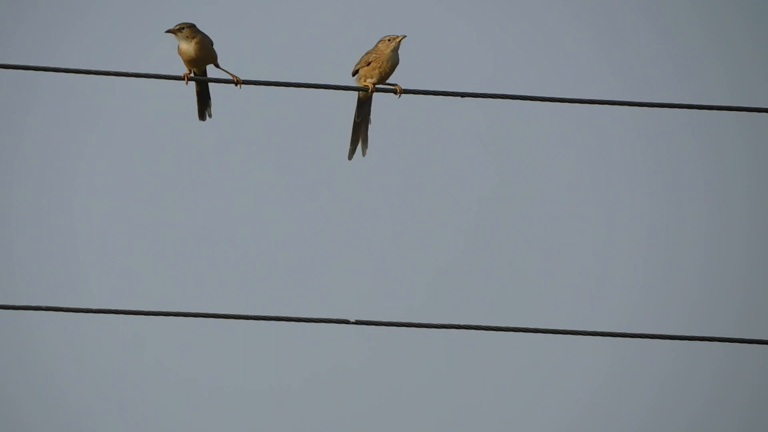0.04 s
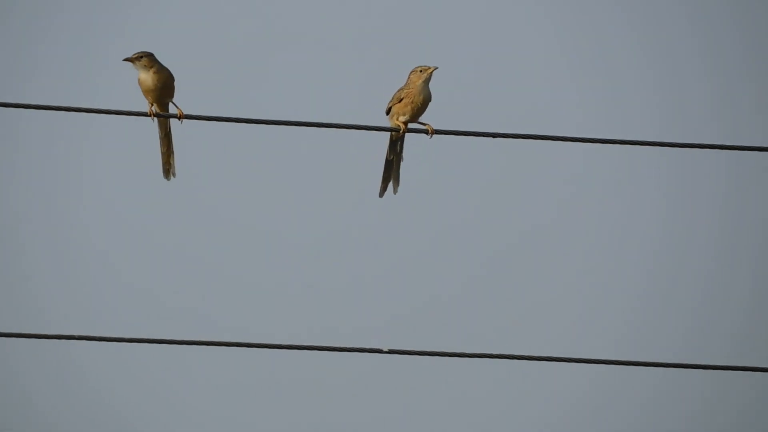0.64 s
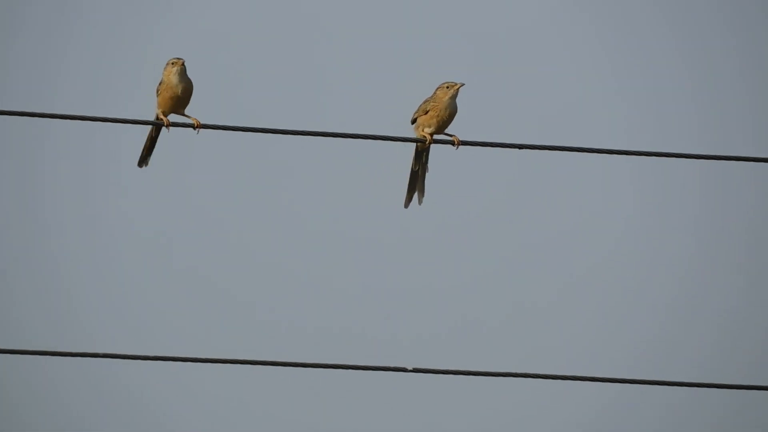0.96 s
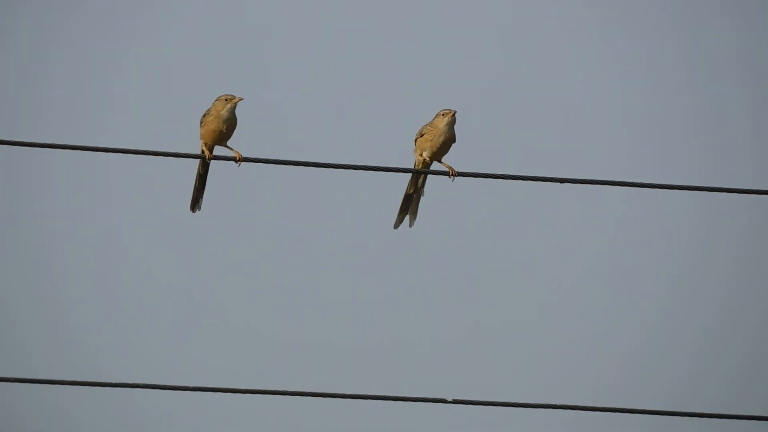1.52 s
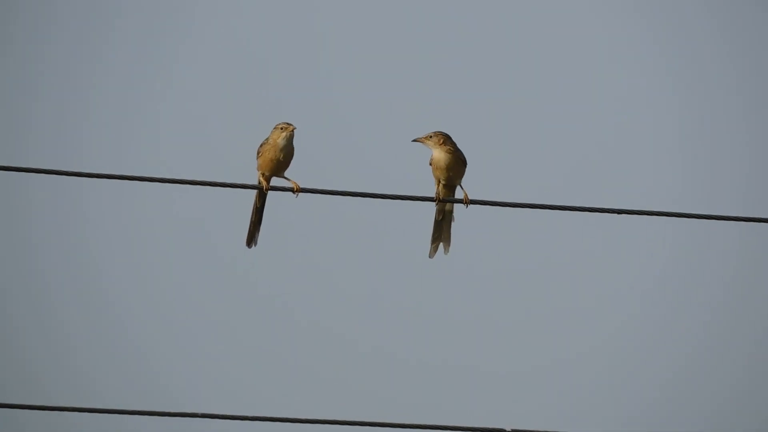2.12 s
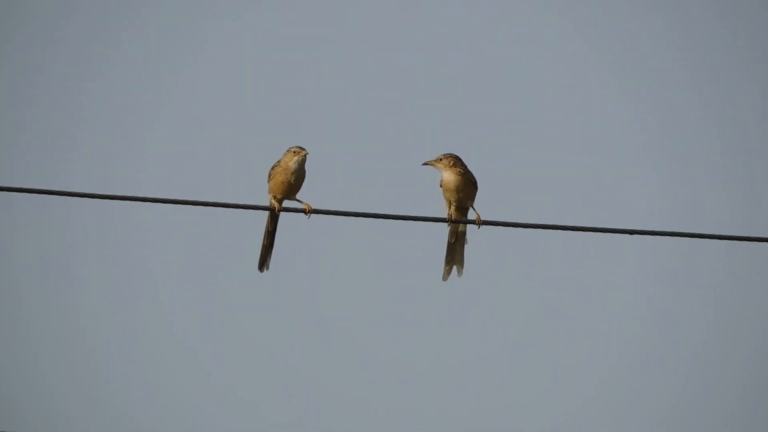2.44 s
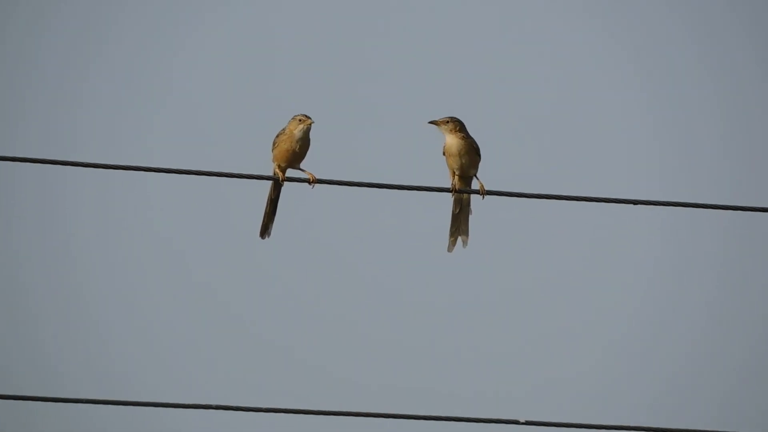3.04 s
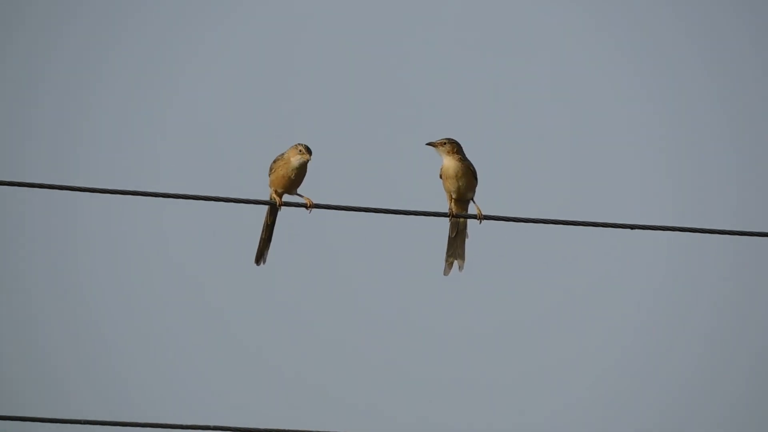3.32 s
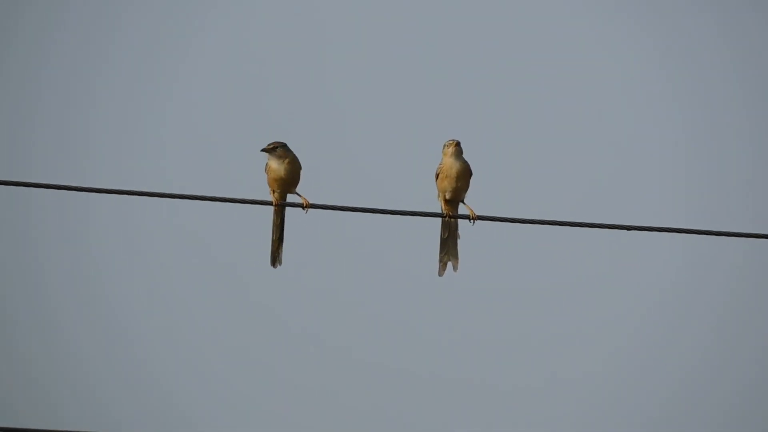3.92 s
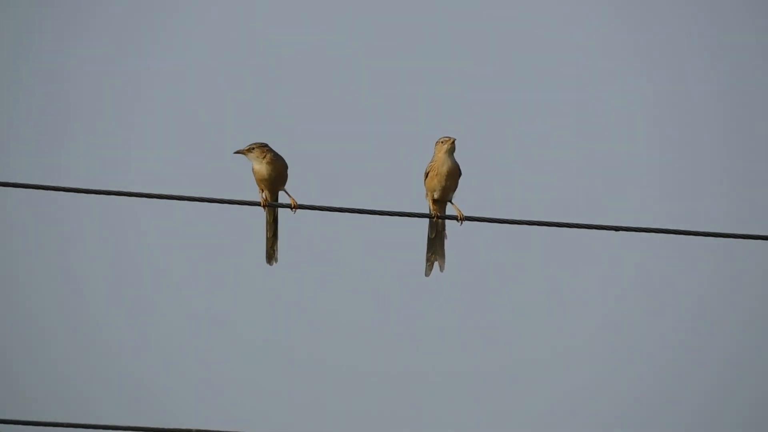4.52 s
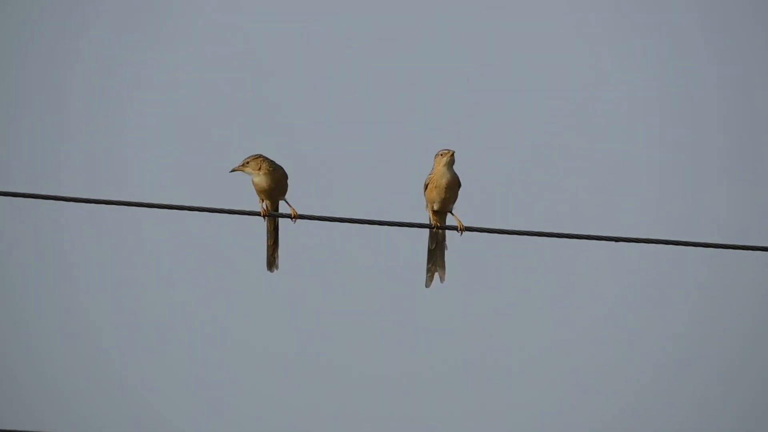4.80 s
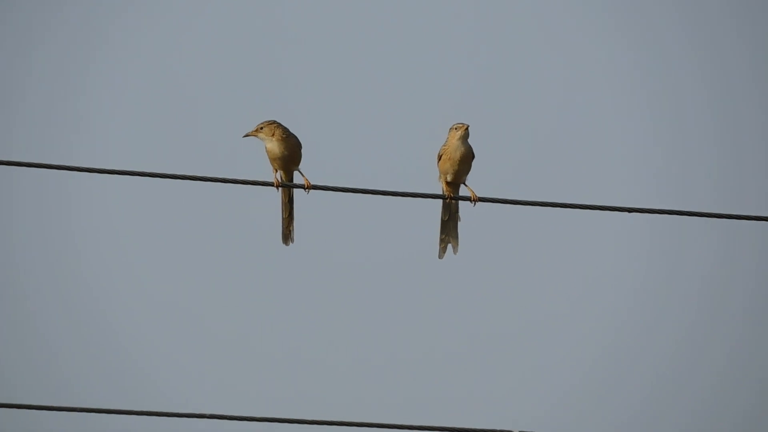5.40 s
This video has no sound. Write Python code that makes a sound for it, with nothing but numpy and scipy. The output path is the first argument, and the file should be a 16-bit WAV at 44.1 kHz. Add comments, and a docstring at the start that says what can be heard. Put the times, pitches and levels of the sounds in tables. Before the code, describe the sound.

Gusty wind buffets the microphone outdoors, mostly on the left, with a low rumble and irregular thumps. It dies down after about four seconds. Behind it, distant traffic murmurs with a faint gear whine and a thin squeal at the start. A small bird gives a few short, sharp chips, while other birds whistle and twitter faintly further off.

```python
"""Gusty wind buffets a camera's two microphone ports in open country, mostly the left one, and dies down.
Eddies thump on the ports, and the air fizzes faintly in the hardest gusts. Behind the wind, far
traffic murmurs and its gears whine, with a thin squeal at first. One small bird gives sharp chips
while others whistle and twitter further off."""
import sys
import numpy as np
from scipy import signal
from scipy.fft import rfft, irfft, next_fast_len
from scipy.io import wavfile
from scipy.ndimage import uniform_filter1d, map_coordinates

SR = 44100
rng = np.random.default_rng(int(sys.argv[2]) if len(sys.argv) > 2 else 0)


def to_wav(sig):
    """Store sig (one row per channel, or 1-D mono) as 16-bit WAV at the path in sys.argv[1].

    Samples outside -1..1 are clipped; the rate is SR.
    """
    pcm = np.clip(np.atleast_2d(sig), -1, 1) * 32767
    pcm = np.round(pcm).astype(np.int16)
    wavfile.write(sys.argv[1], SR, pcm.T)  # frames by channels


N = 244755
T = np.arange(N) / SR

# the hardest single eddies: t/s, relative level/dB, left minus right/dB, swing f/Hz, whirl offset/dB
VORTICES = [(0.314, -6.5, 23, 127.4, -35), (0.408, -4.5, 31, 145.3, -22), (0.465, -5, 28, 174, -14.5),
            (0.81, -11, 23, 212, -7), (0.838, 0, 33, 173, -7), (0.875, -8.5, 8, 172, -22),
            (0.926, -7.5, 27, 240, -18), (0.961, -9.5, 22, 145, -5.5), (1.123, -11, 16, 113.9, -11),
            (1.484, -16.5, 24, 290, -27), (1.99, -8, 19, 149, -5), (2.048, -10, 22, 310, -7),
            (2.081, -0.5, 30, 184, -8), (2.124, -3, 31, 216, -13.5), (2.169, -6, 11, 121, -18),
            (2.209, -6.5, 21, 178.8, -8), (2.287, -3, 20, 126, -24), (2.367, -12, 15, 322.2, -8),
            (2.475, -10.5, 18, 288, -4), (2.493, -3.5, -26, 219, -6), (2.548, -14, -25, 270.6, -4.5),
            (2.634, -11, -14, 186, -7), (2.671, -5.5, 12, 168, -18.5), (3.169, -1.5, 27, 199, -20.5),
            (3.434, -4, 27, 140.7, -10), (3.462, -7, 15, 298.7, 0.5), (3.529, -1.5, 32, 189.8, -18),
            (3.605, -1.5, 32, 187, -16.5), (3.759, -6, 30, 242.5, -4.5), (3.837, -13, 29, 191.4, -5),
            (3.939, -6.5, 29, 180.2, -11.5)]


def undb(db):
    """Decibels to gain."""
    return 10 ** (np.asarray(db) / 20)


def curves(table):
    """Each column after t/s, joined by straight lines."""
    s, *columns = np.transpose(table)
    return [np.interp(T, s, c) for c in columns]


def noise(colour, size=N):
    """Noise of rms 1, coloured by points of f/Hz, level/dB."""
    hz, db = np.transpose(colour)
    n = next_fast_len(size)
    f = np.maximum(np.arange(n // 2 + 1) * SR / n, 1)
    gain = undb(np.interp(np.log(f), np.log(hz), db))
    x = irfft(rfft(rng.standard_normal(n)) * gain, n)[:size]
    return x / x.std()


def smooth(x, samples):
    """Two moving averages in a row."""
    return uniform_filter1d(uniform_filter1d(x, samples), samples)


def walk(rate):
    """Smooth random modulation with a spread of 1 and `rate` new values a second."""
    hold = int(SR / rate)
    x = smooth(np.repeat(rng.standard_normal(N // hold + 1), hold), hold)[:N]
    return x / x.std()


def tone(hz):
    """A sine that follows a pitch curve."""
    return np.sin(2 * np.pi * (np.cumsum(hz) / SR + rng.random()))


def add(out, s, x):
    """Mix a short sound in at time s."""
    i = max(int(s * SR), 0)
    out[i:i + len(x)] += x[:N - i]


def pan(x, left_db):
    """Feed both ports, with the left one left_db above the right."""
    return x * undb(np.array([[left_db], [-left_db]]) / 2)


def shares(left_db):
    """How power divides between the left and the right port."""
    return (1 / (1 + undb([-left_db, left_db]) ** 2))[:, None]


def outdoors(x, wet_db, t60):
    """Ground, trees and walls scatter a short tail, different at each port."""
    t = np.arange(SR // 2) / SR
    tails = rng.standard_normal((2, len(t))) * undb(-60 * t / t60) * (t > .012)
    tails /= np.sqrt(np.sum(tails ** 2, axis=1, keepdims=True))
    return x + undb(wet_db) * signal.fftconvolve(x, tails, axes=1)[:, :N]


def twitter(level_db=-73, low_hz=2400, high_hz=4600, length_s=0.0375, count=40):
    """Many birds, far off, blur into a faint twitter."""
    out = np.zeros(N)
    for when, pitch, slope, size in rng.random((count, 4)):
        u = np.linspace(-1, 1, int(length_s * (.5 + size) * SR))
        hz = (low_hz + pitch * (high_hz - low_hz)) * (1 + .15 * (slope - .6) * u)
        add(out, when * T[-1], tone(hz) * (1 - u ** 2) * undb(level_db))
    return outdoors(pan(out, left_db=-4), wet_db=1, t60=0.47)


def road(floor_db=-50.5, nearer_db=6, recede_s=1.93, side_db=-11):
    """Far tyres and engines: a dull, narrow murmur that recedes to a steady bed."""
    # road noise from afar: f/Hz, level/dB
    colour = [(25, -23), (70, -8), (130, 0), (220, 7.5), (320, 11), (450, 4), (660, 4.5), (900, 1.5),
              (1300, -3.5), (1550, -9), (1900, -14), (2400, -13.5), (3500, -19), (8000, -31)]
    db = floor_db + nearer_db * np.exp(-T / recede_s) + 0.37 * walk(10)
    mid, side = noise(colour), noise(colour)
    murmur = mid + undb(side_db) * side * np.array([[1], [-1]])
    return pan(undb(db) * murmur, left_db=4)


def gear_whine(teeth=35, trim_db=-2.5, flutter_db=2, wander=0.00092, jitter=.002):
    """Far gear teeth sing, with sidebands spaced by the shaft rate; moving air makes each line flutter."""
    # tooth rate: t/s, f/Hz
    pitch = [(0, 1194), (.6, 1197), (1, 1208), (2.1, 1209), (3.15, 1195), (4.05, 1136), (4.4, 1116),
             (4.9, 1115), (5.55, 1152)]
    # the wind carries the whine in and out: t/s, relative level/dB
    fader = [(0.05, -53.5), (1.25, -53), (2.3, -58.5), (2.6, -65), (3.3, -60), (4.05, -59), (4.45, -64),
             (5.05, -62.5), (5.35, -53), (5.55, -54)]
    # lines of the whine: multiple of the shaft rate
    orders = [9.25, 18.5, 33, 34, 35, 37, 38, 39, 40, 49.3, 70]
    # balance of those lines: start level/dB, middle level/dB, end level/dB
    balance = [(8.5, 0.5, -19), (1.5, 0, -4.5), (-0.5, -2.5, -13), (-1, -11, -2.5), (0, 3, 3.5),
               (-0.5, -14, -3), (-11, 1, -14), (-0.5, -12, -5), (-4, -11, -21), (-38, -12, -6),
               (-23, -17, -12)]
    (tooth_hz,), (db,) = curves(pitch), curves(fader)
    shaft_hz = tooth_hz / teeth
    out = 0
    for order, levels in zip(orders, balance):
        line_db = np.interp(T, np.linspace(0, T[-1], len(levels)), levels)
        unsteady = 1 + wander * walk(30.07) + jitter * walk(150)
        out += tone(order * shaft_hz * unsteady) * undb(line_db + flutter_db * walk(16))
    return pan(out * undb(db + trim_db), left_db=3)


def squeals(flutter_db=2, wander=0.00394, rasp=.005, trim_db=-1):
    """Two thin, rough lines in the far traffic beat against each other as they sink and fade."""
    # one track for each squeal: t/s, f/Hz, relative level/dB
    tracks = [
        [(0.04, 1717, -50), (0.12, 1705, -45.5), (0.25, 1729, -56), (0.45, 1680, -60), (0.55, 1644, -52.5),
         (0.7, 1590, -53), (0.82, 1585, -63)],
        [(0.12, 1628, -45.5), (0.21, 1650, -48), (0.36, 1665, -47), (0.47, 1669, -50), (0.55, 1657, -47.5),
         (0.8, 1640, -51), (0.93, 1611, -53.5), (1.08, 1547, -62)],
    ]
    out = 0
    for track in tracks:
        hz, db = curves(track)
        fade = np.clip((T - track[0][0]) / 0.032, 0, 1) * np.clip((track[-1][0] - T) / .01, 0, 1)
        unsteady = 1 + wander * walk(70) + rasp * walk(300)
        out += fade * tone(hz * unsteady) * undb(db + trim_db + flutter_db * walk(88.8))
    return pan(out, left_db=2.5)


def bird_whistles(waver=0.015, flutter_db=2.5, trim_db=0.5):
    """Short slurs, each bent through three pitches and made unsteady by the distance."""
    # notes of the further birds: t/s, length/s, start f/Hz, middle f/Hz, end f/Hz, relative level/dB
    slurs = [(0.814, 0.027, 3370, 3050, 2855, -59), (0.824, 0.063, 2130, 2090, 2050, -57),
             (0.875, 0.047, 1895, 1810, 1710, -55), (1.047, .042, 2160, 2094, 2050, -57),
             (1.084, 0.055, 1865, 1820, 1750, -57.5), (1.644, .027, 3380, 3620, 3400, -67),
             (1.683, 0.023, 3362, 3380, 3150, -70), (2.052, 0.07, 4010, 4450, 4402, -66),
             (2.223, 0.065, 4170, 3938, 3900, -64), (2.278, 0.032, 4124, 4060, 3530, -61.5),
             (4.109, 0.055, 3480, 3505, 3040, -61.5), (4.455, 0.0637, 3000, 2794, 2706, -57.5),
             (4.515, 0.044, 2814, 2597, 2642, -61), (4.646, 0.1, 3350, 3144, 3172, -63.5),
             (4.877, .064, 2710, 2647, 2535, -60), (5.081, 0.11, 4615, 4480, 4210, -73),
             (5.165, 0.068, 3044, 3035, 2990, -66)]
    out, drift = np.zeros(N), 1 + waver * walk(250)
    for s, length, start_hz, middle_hz, end_hz, db in slurs:
        u = np.linspace(-1, 1, int(length * SR))
        hz = middle_hz + u * (end_hz - start_hz) / 2 + u ** 2 * ((start_hz + end_hz) / 2 - middle_hz)
        hz *= drift[int(s * SR):][:len(u)]
        add(out, s, tone(hz) * np.sqrt(1 - u ** 2) * undb(db))
    out *= undb(trim_db + flutter_db * walk(180))
    return outdoors(pan(out, left_db=1), wet_db=-5.5, t60=0.25)


def bird_chips(first_db=-14, third_db=-21, echo_db=-12, echo_s=.013, beak_width_hz=750):
    """The pitch shoots up, holds and drops; the beak rings at the top of the second harmonic's arch."""
    # the nearest bird's second harmonic:
    # t/s, length/s, start f/Hz, top f/Hz, end f/Hz, level/dB, rasp/share of the pitch
    arches = [(0.507, 0.026, 3180, 4560, 2770, -48.5, 0.012),
              (1.418, 0.023, 3340, 4400, 2900, -47.5, 0.0063), (2.579, 0.028, 3604, 4564, 3544, -53, 0.061),
              (4.473, 0.024, 3675, 4550, 3540, -52.5, 0.029)]
    out, shake = np.zeros(N), walk(900)
    for s, length, start_hz, top_hz, end_hz, db, rasp in arches:
        u = np.linspace(-1, 1, int(length * SR))
        droop = np.abs(u) ** np.where(u < 0, 7, 2.6)
        hz = top_hz + (np.where(u < 0, start_hz, end_hz) - top_hz) * droop
        beak = 1 / np.hypot(1, (hz - top_hz) / beak_width_hz)
        hz *= 1 + rasp * shake[int(s * SR):][:len(u)]
        harmonics = tone(hz) + undb(first_db) * tone(hz / 2) + undb(third_db) * tone(hz * 3 / 2)
        note = harmonics * beak * np.sqrt(1 - u ** 2) * undb(db)
        add(out, s, note)
        add(out, s + echo_s, note * undb(echo_db))
    return outdoors(pan(out, left_db=3), wet_db=-5, t60=0.075)


def fizz(pressure, rush_db=-36, tick_db=-19, ticks_per_s=25, tick_s=.0003, smooth_s=0.013):
    """Hard gusts hiss over the ports and now and then tick."""
    # air rushing over a port: f/Hz, level/dB
    colour = [(500, 18), (2000, -2), (5000, -3.5), (9000, 1), (16000, 0)]
    force = np.sqrt(np.abs(smooth(pressure ** 2, int(smooth_s * SR))))
    rush = np.array([noise(colour) * undb(2 * walk(150)) for _ in range(2)])
    kicks = (rng.random((2, N)) < ticks_per_s / SR) * rng.uniform(0.45, 1, (2, N))
    decays = signal.lfilter([1], [1, -np.exp(-1 / (tick_s * SR))], kicks)
    ticks = decays * rng.standard_normal((2, N))
    return force ** 1.06 * (undb(rush_db) * rush + undb(tick_db) * ticks)


def swirl(strength, gain_db=-29, follow=0.37, smooth_s=0.061, bleed=0.33):
    """Air rumbles slowly round the whole camera, following the wind sluggishly over a smaller range."""
    colour = [(6, -20), (20, -11), (33, 6), (55, -4), (120, -1.5), (400, -93)]  # f/Hz, level/dB
    push = np.sqrt(np.abs(uniform_filter1d(np.sum(strength ** 2, axis=0), int(smooth_s * SR))))
    rumble = np.array([noise(colour) for _ in range(2)])
    return pan((rumble + bleed * rumble[::-1]) * push ** follow * undb(gain_db), left_db=6.5)


def airflow(breeze_left_db=6, breeze_eddy_hz=110.46, squareness=3):
    """Breeze and gusts add in power, giving the strength at each port and a power-weighted eddy rate."""
    # the breeze between the gusts: t/s, relative level/dB
    breeze = [(0, -36.5), (0.35, -36), (0.55, -22.5), (0.68, -38.5), (1.2, -31), (1.86, -37.5), (3.3, -36),
              (4.05, -28), (4.22, -36.5), (4.7, -42), (4.9, -47.5), (5.55, -53.5)]
    # gusts on top: centre t/s, length/s, relative level/dB, left minus right/dB, nominal eddy f/Hz
    gusts = [(0.073, 0.062, -21.5, 14, 134.4), (0.183, 0.12, -28, 15, 115), (0.304, 0.038, -18.5, 26, 132),
             (0.449, 0.12, -16, 24, 115.4), (0.771, 0.03, -20, 21, 171), (0.84, 0.15, -16.5, 17, 144.9),
             (0.976, 0.1604, -19, 14, 134.8), (1.117, 0.0619, -18, 20, 94.2), (1.4, 0.12, -23, 15, 130.2),
             (1.506, 0.16, -19.5, 20, 170.3), (1.721, 0.23, -22, 8, 114.9), (1.905, 0.046, -20, 15, 100),
             (1.984, 0.051, -18, 13.5, 139.9), (2.142, 0.2, -15.5, 10.5, 140.2),
             (2.277, 0.051, -15, 27, 114), (2.371, 0.1, -17.5, 0, 144.8), (2.48, 0.11, -16.5, 0.5, 179.7),
             (2.645, 0.063, -19.5, -3, 145.3), (2.722, 0.052, -14, 1, 110), (2.81, 0.06, -18.5, 7.5, 120),
             (2.895, 0.086, -18, 2.5, 114.8), (3.019, 0.086, -18.5, 10, 109.8),
             (3.15, 0.14, -17.5, 15.5, 145.2), (3.33, 0.099, -22, 7.5, 134.9),
             (3.444, 0.0699, -13, 15, 170.2), (3.511, 0.065, -14.5, 27, 139.7),
             (3.603, 0.042, -15, 22, 160.1), (3.76, 0.089, -16, 22, 164.8), (3.929, 0.15, -18, 2, 128.2),
             (4.005, 0.0346, -19, 11, 164.9), (4.069, 0.0696, -26, 12, 145), (4.148, 0.035, -31, 7, 99.6),
             (4.321, 0.049, -33, 6.5, 94.9), (4.379, 0.065, -30.5, -15, 89.6),
             (4.622, 0.059, -22.5, 11, 67.8), (4.756, 0.093, -32, 0.5, 85.4),
             (5.142, 0.042, -31, 9.5, 82.25), (5.501, 0.15, -37.5, 8, 80)]
    breeze_db, = curves(breeze)
    power = undb(breeze_db) ** 2 * shares(breeze_left_db)
    weighted_hz = undb(breeze_db) ** 2 * breeze_eddy_hz
    for s, length, db, left_db, hz in gusts:
        near = slice(max(int((s - 2 * length) * SR), 0), int((s + 2 * length) * SR))
        swell = undb(db) ** 2 * np.exp(-2 * np.abs(2 * (T[near] - s) / length) ** squareness)
        power[:, near] += swell * shares(left_db)
        weighted_hz[near] += swell * hz
    return np.sqrt(power), weighted_hz / power.sum(axis=0)


def eddies(rate_hz, reference_hz=134.37, follow=.85, evenness=0.78, smooth_s=0.042,
           puffs_per_s=70, puff_db=3, puff_speed=.14):
    """A frozen pattern of turbulence is blown past a port in puffs: faster air shortens the eddies."""
    # turbulence at the reference eddy rate: f/Hz, level/dB
    colour = [(12, -46), (30, -9), (70, 0.5), (120, -1.5), (185, -5), (260, -10.5), (350, -21.5),
              (480, -40), (700, -76), (1200, -100)]
    puff = np.clip(walk(puffs_per_s), -2, 2)
    travel = np.cumsum((rate_hz / reference_hz) ** follow * np.exp(puff_speed * puff))
    pattern = noise(colour, size=int(travel[-1]) + 2)
    # even out the pattern, so that the gust, more than chance, sets how strong the eddies are
    pattern /= smooth(pattern ** 2, int(smooth_s * SR)) ** (evenness / 2)
    return map_coordinates(pattern, [travel], order=1) * undb(puff_db * puff)


def buffets(trim_db=-2, swing_cycles=0.37, neighbour_db=-7, scatter=0.22,
            whirl_db=-4.5, whirl_hz=400, whirl_cycles=0.73, whirl_gap_s=0.00491):
    """A vortex on a port pushes, then sucks. Weaker ones lead and trail it; quick whirls ride on each."""
    out = np.zeros((2, N))
    t = np.arange(-SR // 30, SR // 30) / SR
    chances = rng.uniform(-1.022, 1, (len(VORTICES), 3, 3))
    for (s, db, left_db, hz, offset_db), chance in zip(VORTICES, chances):
        thump = 0
        for rank, (turn, size, late) in zip((-1, 0, 1), chance):  # leading, main, trailing
            u = t * hz - rank * (1.267 + scatter * late)  # time in swing cycles
            swing = -np.sin(2 * np.pi * u) * np.exp(-.5 * (u / swing_cycles) ** 2)
            thump += swing * undb(abs(rank) * (neighbour_db + 1.8 * size))
            v = (t - rank * whirl_gap_s * (1 + .5 * late)) * whirl_hz * (1 + scatter * size)
            whirl = np.cos(2 * np.pi * v + np.pi * turn) * np.exp(-.5 * (v / whirl_cycles) ** 2)
            thump += whirl * undb(offset_db + whirl_db + abs(rank) * neighbour_db / 2)
        for port, share in zip(out, shares(left_db)):
            add(port, s + t[0], thump * np.sqrt(share) * undb(db + trim_db))
    return out


def wind(trim_db=-2, surge_db=1.2, surges_per_s=28, bleed=0.069, duck_db=-6, duck_s=0.0067):
    """Each port's own eddies surge in the gusts, give way to buffets and bleed into the other port."""
    strength, rate_hz = airflow()
    crossing = np.max([np.exp(-np.minimum(((T - s) / duck_s) ** 2, 20)) for s, *_ in VORTICES], axis=0)
    ports = np.array([eddies(rate_hz), eddies(rate_hz)])
    surge = np.clip(walk(surges_per_s), -2, 2)
    ports *= strength * undb(trim_db + surge_db * surge + duck_db * crossing)
    return ports + bleed * ports[::-1] + buffets() + swirl(strength)


def scene():
    """Wind on the ports over far traffic and birds."""
    pressure = wind()
    traffic = road() + outdoors(gear_whine() + squeals(), wet_db=-11, t60=0.47)
    return pressure + fizz(pressure) + traffic + bird_chips() + bird_whistles() + twitter()


def record(dry, hiss_db=-58.5, top_hz=15750, silent_s=.038, fade_s=.015):
    """A brief silence, then the sound fades in. The camera adds its own hiss and cuts the top."""
    # microphone hiss: f/Hz, level/dB
    colour = [(100, 8), (1500, 3), (3000, -1), (4500, 2.5), (6000, 1), (10000, -0.5), (16000, -3)]
    hiss = undb(hiss_db) * np.array([noise(colour), noise(colour)])
    fade_in = np.clip((T - silent_s) / fade_s, 0, 1)
    high_cut = signal.ellip(14, .1, 80, top_hz, fs=SR, output="sos")
    return signal.sosfilt(high_cut, (dry + hiss) * fade_in)


dry = scene()
out = record(dry)
to_wav(out)
```